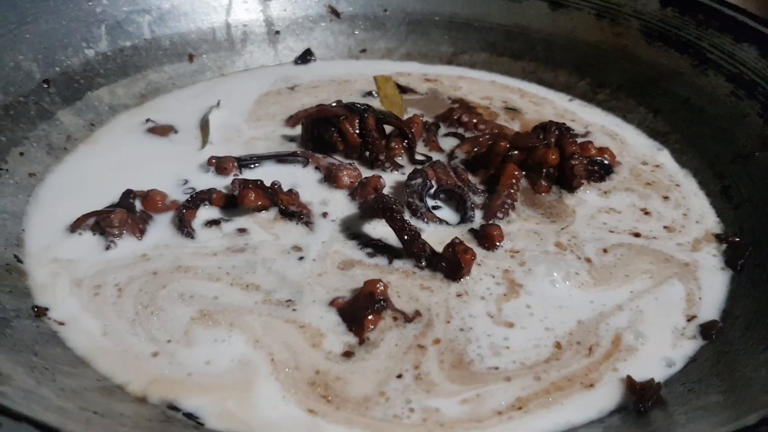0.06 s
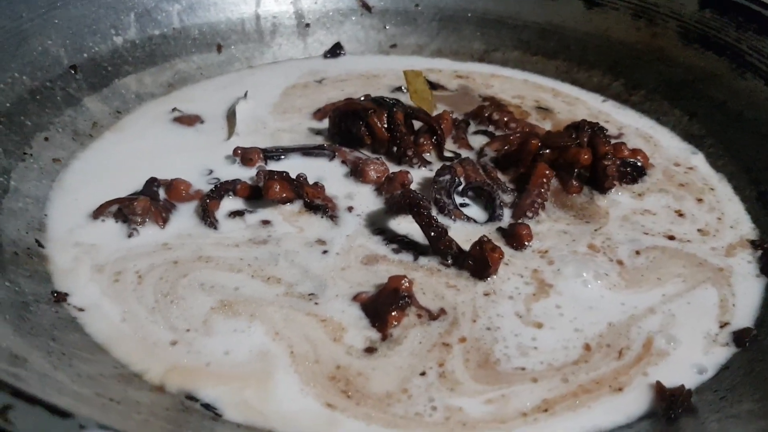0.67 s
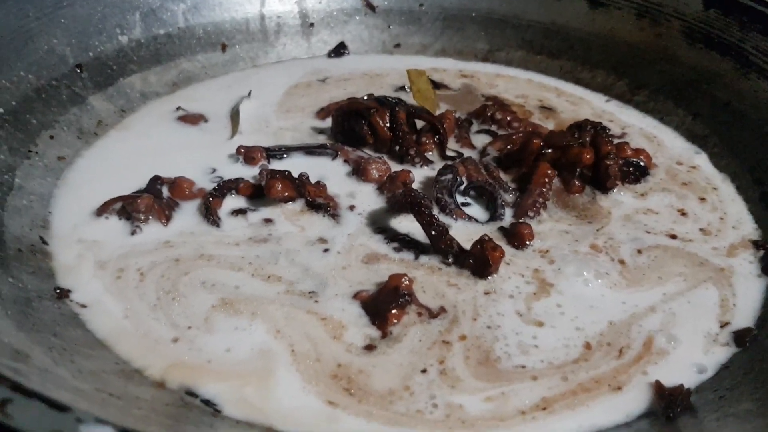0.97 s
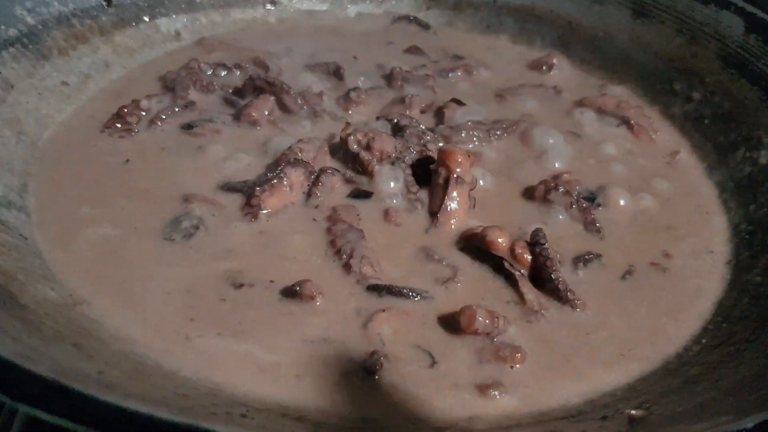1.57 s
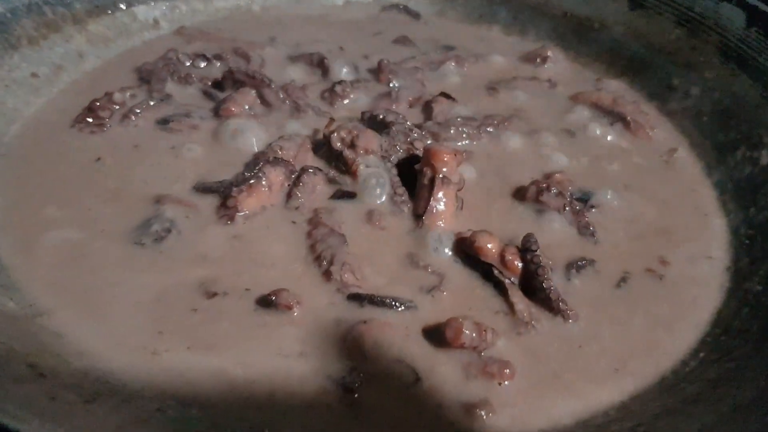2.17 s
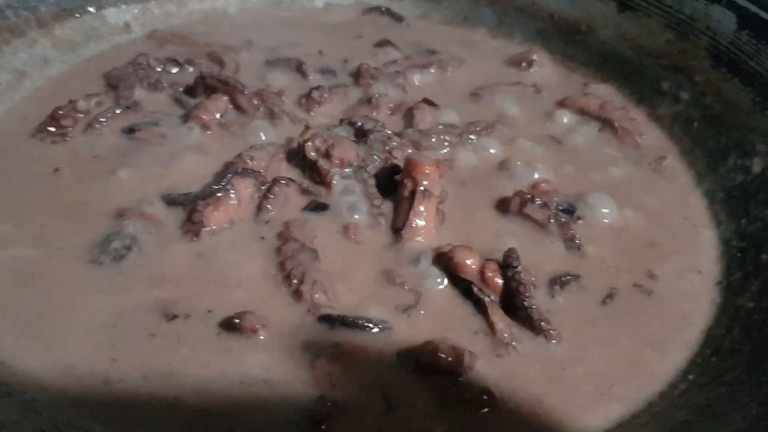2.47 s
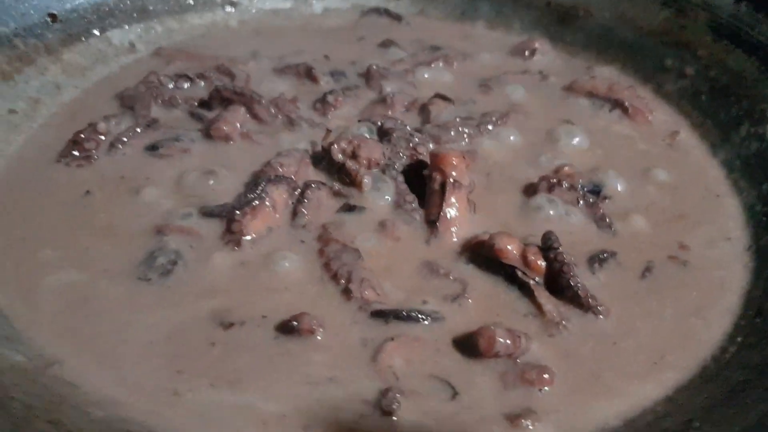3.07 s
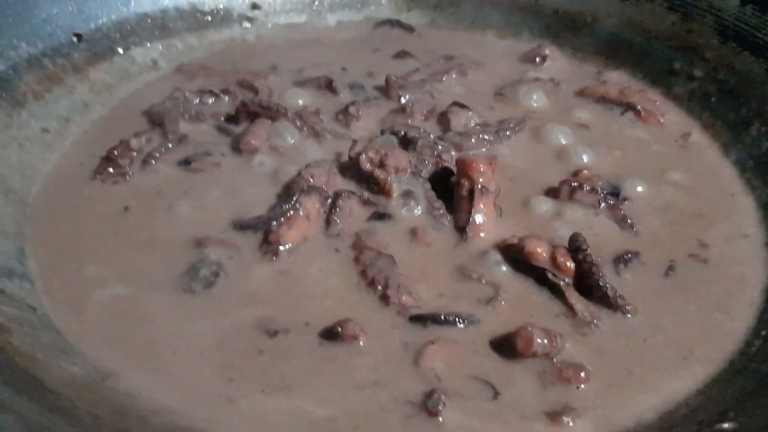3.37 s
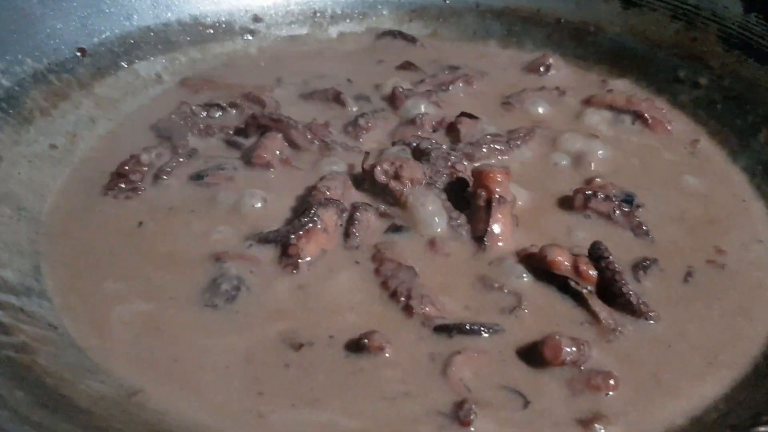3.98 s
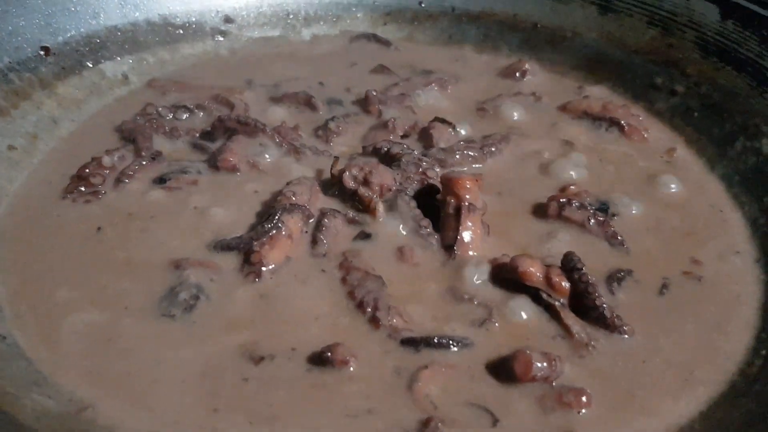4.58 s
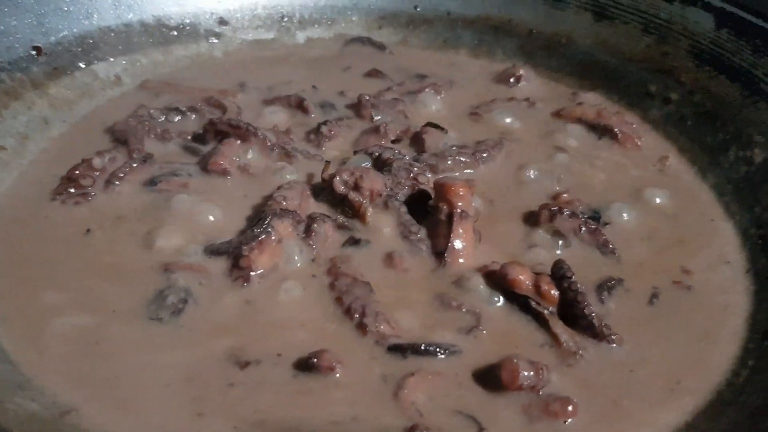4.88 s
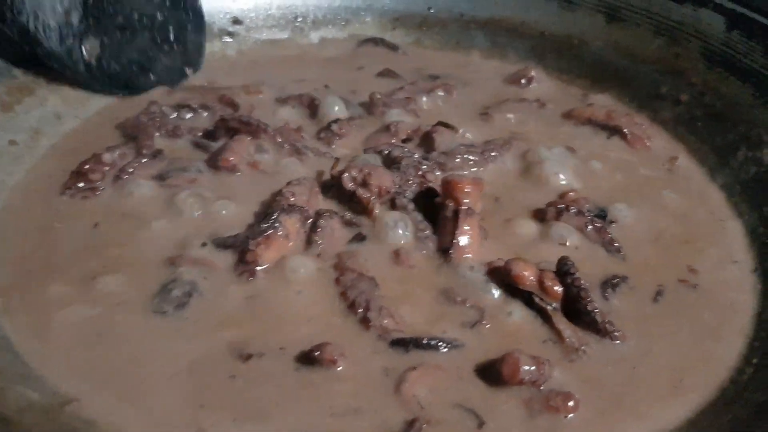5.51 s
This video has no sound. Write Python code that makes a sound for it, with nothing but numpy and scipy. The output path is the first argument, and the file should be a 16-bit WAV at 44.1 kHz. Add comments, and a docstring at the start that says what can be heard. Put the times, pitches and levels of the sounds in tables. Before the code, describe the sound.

A fan's motor hums under the soft, bright sizzle of sauce simmering in a nearby wok in a small kitchen. The sizzle briefly swells as drops begin to spit and bubbles pop. Around the middle, a deep finger rub on the microphone ends in a single thump on the left. The simmer then grows a little livelier, with crackling, small plops and scattered sharp spits slightly to the right.

```python
"""A small kitchen, where meat simmers in a milky sauce in a wok while a fan hums.
Tiny bursts of steam sizzle along the hot rim. Small bubbles crackle, bigger ones plop,
and now and then a drop flashes to steam with a sharp spit. Halfway through, a finger
rubs by the left microphone port (its sound hole) and knocks on it once.
Behind it all, the fan's motor hums and its rushing air makes the housing ring."""
import sys
import numpy as np
from scipy import signal
from scipy.fft import rfft, irfft, next_fast_len
from scipy.io import wavfile
from scipy.ndimage import uniform_filter1d

SR = 44100
rng = np.random.default_rng(int(sys.argv[2]) if len(sys.argv) > 2 else 0)


def wrap_up_sound(samples):
    """Save the sound to the file named by the first command line argument, as 16-bit audio."""
    columns = np.atleast_2d(samples).T
    # keep every value between -1 and 1, then stretch to whole-number steps
    tamed = np.clip(columns, -1, 1)
    steps = np.round(tamed * 32767).astype(np.int16)
    wavfile.write(sys.argv[1], SR, steps)


N = 249165
TIME = np.arange(N) / SR
KITCHEN_T60_S = 0.19   # a "t60" is the time a sound takes to fade by 60 dB
RIGHT_DELAY_S = 0.000225   # the right port hears steady sounds this much later


# How hard the sauce simmers: time_s, level_db
SIMMER_STRENGTH = [(0, -46), (0.6, -48), (2.4, -46.5), (2.75, -45), (4.8, -45), (5.65, -43.5)]
# The tone of the crackle, from low to high: pitch_hz, level_db
CRACKLE_TONE = [(2000, -15.5), (2900, -6.5), (3800, -3.5), (4850, 0), (5600, -2), (7100, -6.5),
                (8000, -28.5), (10000, -24), (12000, -5.5), (15600, -9.5)]

def bubble_crackle(simmer_db, boost_db=2.0, most_per_s=700, room_db=5.5, growth=1.72):
    """Small bubbles burst in puffs of hiss, more often and louder as the simmer builds."""
    peak_db = np.max(simmer_db)
    below_peak_db = simmer_db - peak_db
    pop_energy = random_clicks(most_per_s * from_db(below_peak_db), spread_db=3.0) ** 2
    puff, room = noise_burst(t60_s=0.0065), from_db(room_db) * noise_burst(KITCHEN_T60_S)
    fade = uniform_filter1d(puff ** 2 + room ** 2, size=16)
    energy = signal.fftconvolve([pop_energy], fade, axes=1)[:, :N]   # every pop gets this fade
    puffs = np.sqrt(np.abs(energy)) * stereo_noise()
    gain = from_db(peak_db + boost_db + growth * below_peak_db)
    return gain * shape_tone(puffs, CRACKLE_TONE) * pan(-20.0)


# Moments when the sizzle flares up: peak_s, length_s, boost_db
SIZZLE_FLARES = [(1.95, 0.43, 2.5), (2.63, 0.18, 5), (5.357, 0.72, 1.8)]

def sauce_flares():
    """Sauce washes over hot metal: the extra sizzle, in dB, swells and sinks smoothly."""
    return sum(db * np.exp(-(2 * (TIME - peak_s) / length_s) ** 2)
               for peak_s, length_s, db in SIZZLE_FLARES)


# The tone of the sizzle: pitch_hz, level_db
SIZZLE_TONE = [(1400, -7.5), (2500, -16), (3500, -11), (5000, -9), (7000, -8), (8000, -18), (9000, -16.5),
               (10500, -8.5), (12000, -5.5), (13300, -5), (15600, -11.5)]

def rim_sizzle(simmer_db, flare_db, base_db=-45.5):
    """Countless tiny bursts of steam go off where the sauce meets the hot rim."""
    level_db = base_db - 0.75 * (simmer_db - simmer_db.mean()) + flare_db   # softer in a hard simmer
    pan_db = 7.5 - 1.5 * flare_db   # a flare pulls the sound towards the right
    bursts = np.array([random_clicks(per_s=14000, spread_db=2.0) for _ in range(2)])
    return from_db(level_db) * shape_tone(bursts, SIZZLE_TONE) * pan(pan_db)


# Drops that spit; each part of the sound adds its own offset to these levels and pans:
# start_s, crack_db, pitch_hz, splash_db, snap_db, pan_db
SPITTING_DROPS = [(1.9108, -39, 4800, -39, -46, -1), (1.9696, -34, 6300, -46, -41, 2),
                  (2.0294, -36, 5060, -30, -28.5, -14), (2.249, -25, 5940, -36, -39, 0),
                  (2.752, -29, 4470, -49, -47, -4), (2.9205, -31, 5070, -42, -45, -12),
                  (3.056, -29.5, 5100, -50, -48, -14), (3.5409, -35, 5090, -55, -55, -10),
                  (3.6346, -50, 4670, -42, -41.5, -16), (3.8581, -29.5, 5070, -44, -54, -14),
                  (3.9938, -26, 4530, -52, -51, -8), (4.0341, -29, 5130, -37, -24.5, -19),
                  (4.4541, -14.5, 4720, -36, -29, -8), (4.4788, -28, 5030, -36, -37, -16),
                  (4.8534, -12.5, 5030, -36, -25.5, -7), (4.9526, -27, 4580, -54, -52, -14),
                  (5.1562, -21, 4750, -39, -39, -12), (5.2322, -24.5, 4870, -37, -44, -3),
                  (5.4794, -36, 3930, -36, -48, -11), (5.5081, -22.5, 4670, -38, -40, -6)]

def spitting_drops(crack_width=1.11, spray_t60_s=0.01, click_db=-6.0):
    """A drop flashes to steam: one click and a short spray, which the kitchen echoes."""
    out = np.zeros((2, N))
    scale = np.sqrt(0.004 * SR)   # levels count as if each part's energy were spread over 4 ms
    for start_s, crack_db, pitch_hz, splash_db, snap_db, pan_db in SPITTING_DROPS + faint_drops():
        burst = from_db(click_db) * signal.unit_impulse(SR // 4) + noise_burst(spray_t60_s)
        room = noise_burst(KITCHEN_T60_S)
        sharpness_db = max(splash_db, snap_db) - crack_db
        room_db = 0.5 + 0.32 * sharpness_db   # sharp spits fill the room more
        parts = [(crack_db - 7, pitch_hz / crack_width, pitch_hz * crack_width, -22),   # pitched crack
                 (crack_db - 18, 2950, 3650, -22),   # hollow body
                 (splash_db + 2, 1400, 6000, -4.5),   # broad splash
                 (snap_db + 2, 11500, 15300, -4.5)]   # bright snap
        for level_db, low_hz, high_hz, extra_pan_db in parts:
            direct = unit_energy(band(burst, low_hz, high_hz)) * pan(pan_db + extra_pan_db)
            echo = unit_energy(band(room, low_hz, high_hz)) * from_db(room_db)   # from all sides
            mix_in(out, from_db(level_db) * scale * (direct + echo), start_s)
    return out


def faint_drops(count=8, from_s=2.8, typical_hz=4900, pan_db=-11):
    """Fainter drops spit at random once the simmer has built up: more rows like SPITTING_DROPS."""
    slot_s = (N / SR - from_s) / count
    starts_s = from_s + slot_s * (np.arange(count) + rng.random(count))
    size, pitch = rng.standard_normal((count, 2)).T
    levels_db = -33.5 + size
    pitches_hz = typical_hz * 2 ** (0.15 * pitch)
    return [(start_s, db, hz, db - 24, db - 24, pan_db)
            for start_s, db, hz in zip(starts_s, levels_db, pitches_hz)]


# Big bubbles opening, before boost_db is added: start_s, level_db, pitch_hz
BIG_BUBBLES = [(2.288, -45, 1860), (2.4104, -45, 1610), (2.938, -54, 1460), (3.0033, -46.5, 2090),
               (3.1782, -49, 1480), (3.3854, -43.5, 1860), (4.002, -46, 1830), (4.347, -50, 2170),
               (4.3537, -47, 1830), (5.3926, -42.5, 2900)]
# The softest a small plop can be at each moment: time_s, level_db
SMALL_PLOP_LEVEL = [(0, -48), (1.8, -51), (2.3, -43), (2.6, -33.5), (2.9, -54), (4.2, -48.5), (5.65, -57)]

def bubble_plops(boost_db=17.0, pan_db=-2.0, small_count=260, low_hz=900, high_hz=2400):
    """A few big bubbles open among many small ones of random size and place."""
    out = np.zeros((2, N))
    for start_s, level_db, pitch_hz in BIG_BUBBLES:
        mix_in(out, from_db(level_db + boost_db) * one_bubble(pitch_hz) * pan(pan_db), start_s)
    softest_db = over_time(SMALL_PLOP_LEVEL)
    for when, pitch, chance, place in rng.random((small_count, 4)):
        start = int(when * N)
        level_db = softest_db[start] + 4.0 * min(-np.log(chance), 3)   # a few are much louder
        pitch_hz = low_hz * (high_hz / low_hz) ** pitch
        plop = from_db(level_db) * one_bubble(pitch_hz)
        mix_in(out, plop * pan(pan_db + 10 * (place - .5)), start / SR)
    return out


def one_bubble(pitch_hz, t60_s=0.02, attack_s=0.00066, rise_per_s=4.8, puff=0.93, puff_width=1.11):
    """An opening bubble rings briefly and rises in pitch, inside a soft puff of steam."""
    t = TIME[:SR // 20]
    ring = np.sin(2 * np.pi * pitch_hz * (t + rise_per_s * t ** 2 / 2))
    steam = unit_level(band(rng.standard_normal(len(t)), pitch_hz / puff_width, pitch_hz * puff_width))
    blend = (ring + puff * steam) / np.sqrt(1 + 2 * puff ** 2)
    return blend * fade_out(t, t60_s) * (1 - np.exp(-t / attack_s))


# How loudly the finger rubs: time_s, level_db
RUB_LEVEL = [(0, -66), (1.68, -61), (1.8, -46.5), (2.3, -53), (2.55, -52), (2.75, -39), (2.9, -66),
             (5.65, -68)]
# The deep tone of the rubbing: pitch_hz, level_db
RUB_TONE = [(20, -20), (33, -5), (43, 13), (56, -5), (150, -43), (400, -78)]

def finger_rub():
    """A finger rumbles along the case beside the left port."""
    return from_db(over_time(RUB_LEVEL)) * shape_tone(stereo_noise(), RUB_TONE) * pan(14.0)


def finger_knock(at_s=2.7673, width_s=0.0002, rebound_s=0.0012, swing_hz=67, right_db=-38.0):
    """The finger hits the left port: one spike of air pressure, then a low swing as it settles."""
    t = TIME - at_s
    after_s = np.maximum(t, 0)
    spike = -0.93 * np.exp(-.5 * (t / width_s) ** 2)
    fade_in = 1 - np.exp(-after_s / rebound_s)
    swing = 0.67 * np.sin(2 * np.pi * swing_hz * after_s + np.pi / 4)
    return (spike + swing * fade_in * fade_out(after_s, t60_s=0.073)) * from_db([[0], [right_db]])


# The motor's nearly steady pitch: time_s, pitch_hz
MOTOR_PITCH = [(0, 108.36), (1.2, 108.42), (2.2, 108.75), (3.5, 108.86), (5.65, 108.8)]
# The hum's three strong tones, before any changes in level: pitch_multiple, level_db, flutter_db
STRONG_TONES = [(1, -42.5, 1.6), (2, -39, 1.25), (3, -41, 1)]
# Its weak higher tones: pitch_multiple, level_db
WEAK_TONES = [(4, -56.5), (6, -65), (7, -61), (9, -68), (10, -62), (20, -61.5), (21, -59.5)]
# The lowest tone fades in and out: time_s, change_db
LOWEST_TONE_FADE = [(0, 1), (0.45, 4), (1.15, -6), (1.35, 0), (2.1, -6), (2.5, 0), (3.1, 4), (3.4, -20),
                    (3.72, -1.5), (4.1, -9), (4.4, -4), (5.65, -3.5)]
# The third tone sinks once and comes back stronger: time_s, change_db
THIRD_TONE_FADE = [(0, 0.5), (2.2, -3.5), (2.65, -7), (3.0, 0), (4.0, 2.5), (5.65, 1)]
# The strong tones and the rush of air swell and dip together: time_s, change_db
FAN_SWELL = [(0, 0.2), (1.15, 0.1), (1.75, 0.6), (2.3, 1.3), (2.7, 0.5), (3.15, -3.5), (4.85, -3),
             (5.55, 1.4)]

def fan_hum(swell_db, waver_db=3.0):
    """The motor hums at multiples of one pitch; the weak tones waver in the draught."""
    cycles = np.cumsum(over_time(MOTOR_PITCH)) / SR
    phase = 2 * np.pi * np.array([cycles, np.interp(TIME - RIGHT_DELAY_S, TIME, cycles)])
    fades_db = [over_time(LOWEST_TONE_FADE), 0, over_time(THIRD_TONE_FADE)]
    strong = [(multiple, db + swell_db + fade_db + flutter_db * wander(rate_hz=4.3))
              for (multiple, db, flutter_db), fade_db in zip(STRONG_TONES, fades_db)]
    weak = [(multiple, db + waver_db * wander(rate_hz=7.1)) for multiple, db in WEAK_TONES]
    out = np.zeros((2, N))
    for multiple, level_db in strong + weak:
        pan_db = -0.4 if multiple < 20 else -36.0   # the high whine sits on the right
        out -= from_db(level_db) * np.cos(multiple * phase) * pan(pan_db)   # all dip once a cycle
    return np.sqrt(2) * out


# The tone of the rushing air: pitch_hz, level_db
AIR_TONE = [(20, -18), (32, -8.5), (65, -20), (95, 0.5), (140, -13.5), (200, -8), (270, -12), (380, -9.5),
            (620, -14.5), (1000, -11.5), (1400, -14), (2200, -11.5), (3000, -19.5), (6000, -32)]
# Pitches at which the fan's housing rings: pitch_hz, width_hz, level_db
HOUSING_RINGS = [(100, 75, -53.5), (184.5, 11.6, -58.5), (316.5, 13.5, -50.5), (432, 150, -58.5),
                 (517, 46, -63.5), (988, 24, -64), (1689, 87, -64), (2287, 26, -54.5), (2318, 102, -56.5)]

def fan_air(swell_db, rush_db=-39.5):
    """Swirling air rushes through the fan and makes its housing ring."""
    out = from_db(swell_db + rush_db) * shape_tone(stereo_noise(), AIR_TONE)
    for pitch_hz, width_hz, level_db in HOUSING_RINGS:
        ring = unit_level(band(stereo_noise(), pitch_hz - width_hz / 2, pitch_hz + width_hz / 2))
        # Low rings reach both ports alike; high ones lean to the right.
        out += from_db(level_db) * (ring[0] if pitch_hz < 1200 else ring * pan(-16.0))
    return out


# How alike left and right sound, from 0 (unrelated) to 1 (the same): pitch_hz, likeness
STEREO_LIKENESS = [(30, 0.49), (100, 0.68), (350, 1), (650, 0.57), (1500, 0.35), (3000, 0.083),
                   (5000, 0.055), (12000, 0.031)]

def shape_tone(pair, tone):
    """Turn two unrelated signals into one stereo sound with this tone, most alike at low pitches."""
    size = next_fast_len(N)
    hz = np.fft.rfftfreq(size, 1 / SR)
    middle, side = rfft(pair, size)
    likeness = over_pitch(STEREO_LIKENESS, hz)
    stereo = np.sqrt(1 + likeness) * middle + np.sqrt(1 - likeness) * side * [[1], [-1]]
    delay = np.exp(-2j * np.pi * hz * RIGHT_DELAY_S * np.array([[0], [1]]))
    spectrum = stereo * delay * from_db(over_pitch(tone, hz))
    return unit_level(irfft(spectrum, size)[:, :N])


def over_time(table):
    """Join a table's points with straight lines, giving a value for every sample."""
    times_s, values = np.transpose(table)
    return np.interp(TIME, times_s, values)


def over_pitch(table, hz):
    """Read a table between its pitches, with octaves evenly spaced."""
    pitches_hz, values = np.transpose(table)
    return np.interp(np.log(hz + 1e-9), np.log(pitches_hz), values)


def from_db(db):
    """Turn decibels into a number to multiply by."""
    return 10 ** (np.asarray(db) / 20)


def pan(pan_db):
    """Left and right gains of constant power: above 0 dB leans left, below 0 leans right."""
    gains = from_db(np.array([[.5], [-.5]]) * pan_db)
    return gains / np.sqrt(np.mean(gains ** 2, axis=0))


def unit_level(sound):
    """Scale a sound so its average (rms) level is 1."""
    return sound / np.sqrt(np.mean(sound ** 2) + 1e-20)


def unit_energy(sound):
    """Scale each channel so its total energy is 1."""
    return sound / np.linalg.norm(sound, axis=-1, keepdims=True)


def fade_out(t, t60_s):
    """A gain that starts at 1 and dies away."""
    return np.exp(-np.log(1000) * t / t60_s)


def stereo_noise():
    """Plain hiss, unrelated on the left and right."""
    return rng.standard_normal((2, N))


def noise_burst(t60_s):
    """A dying burst of hiss, unrelated on the left and right."""
    t = TIME[:SR // 4]
    return unit_energy(rng.standard_normal((2, len(t))) * fade_out(t, t60_s))


def random_clicks(per_s, spread_db):
    """Clicks at random moments, many small and a few large."""
    sizes = from_db(spread_db * np.minimum(rng.exponential(1, N), 4))
    return sizes * rng.choice([-1, 1], N) * (rng.random(N) < per_s / SR)


def wander(rate_hz):
    """A smooth random wobble, about 1 in size."""
    hz = np.fft.rfftfreq(N, 1 / SR)
    return unit_level(irfft(rfft(rng.standard_normal(N)) / (1 + (hz / rate_hz) ** 2), N))


def band(sound, low_hz, high_hz, order=2):
    """Keep the part of a sound between two pitches."""
    return signal.sosfilt(signal.butter(order, [low_hz, high_hz], "band", fs=SR, output="sos"), sound)


def mix_in(out, sound, start_s):
    """Add a short sound to the mix at the given time."""
    start = round(start_s * SR)
    out[:, start:start + sound.shape[1]] += sound[:, :N - start]


def scene():
    """The simmering wok, the fan behind it and the finger on the microphone."""
    simmer_db, flare_db, swell_db = over_time(SIMMER_STRENGTH), sauce_flares(), over_time(FAN_SWELL)
    sizzle = rim_sizzle(simmer_db, flare_db)
    crackle = bubble_crackle(simmer_db + 0.38 * flare_db)   # flares stir up the bubbles too
    wok = sizzle + crackle + spitting_drops() + bubble_plops()
    fan = fan_hum(swell_db) + fan_air(swell_db)
    return wok + fan + finger_rub() + finger_knock()


# Pitches that the right microphone port lifts or cuts: pitch_hz, width_hz, change_db
RIGHT_PORT_BANDS = [(4620, 4100, 2.5), (8700, 730, -1.5), (13100, 6500, -3)]

def record(dry, cutoff_hz=15750):
    """The right port colours its side, peaks are clipped and the highest treble is cut."""
    left, right = dry
    for pitch_hz, width_hz, change_db in RIGHT_PORT_BANDS:
        part = band(right, pitch_hz - width_hz / 2, pitch_hz + width_hz / 2, order=1)
        right = right + (from_db(change_db) - 1) * part
    treble_cut = signal.ellip(10, .1, 80, cutoff_hz, fs=SR, output="sos")
    return signal.sosfilt(treble_cut, np.clip([left, right], -1, 1))


dry = scene()
out = record(dry)
wrap_up_sound(out)
```